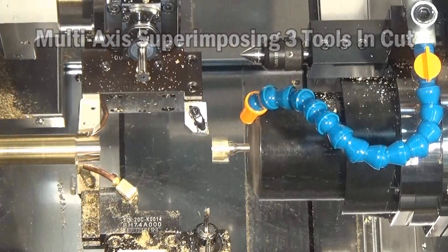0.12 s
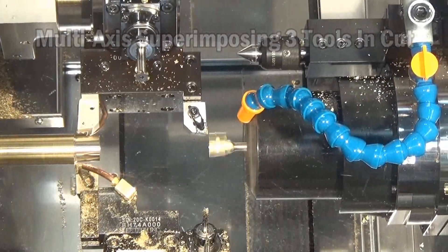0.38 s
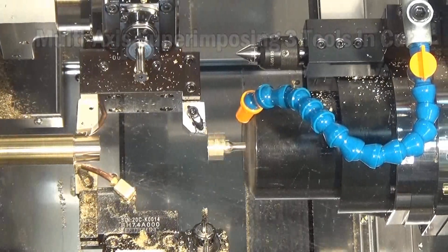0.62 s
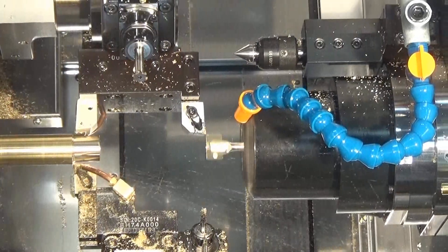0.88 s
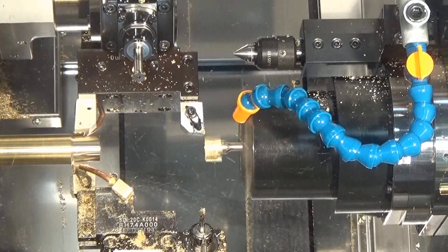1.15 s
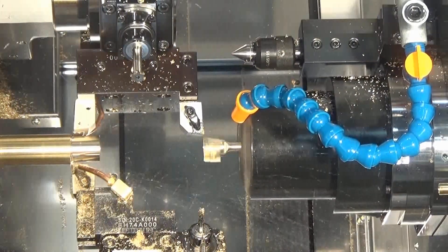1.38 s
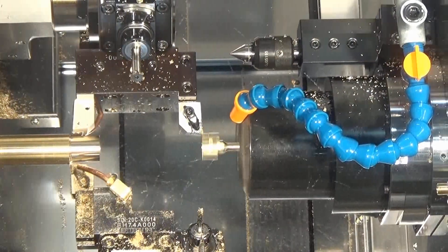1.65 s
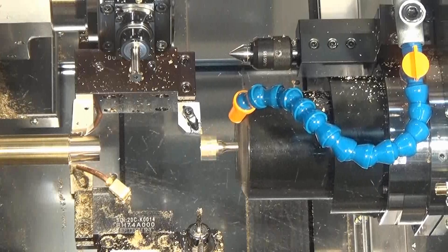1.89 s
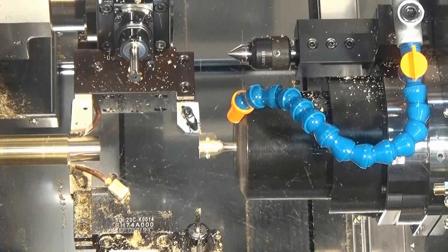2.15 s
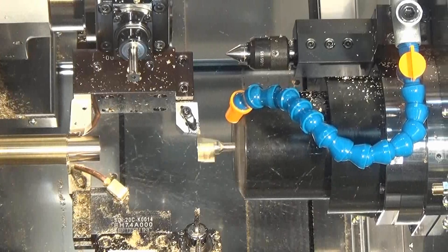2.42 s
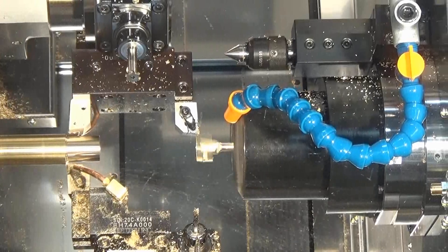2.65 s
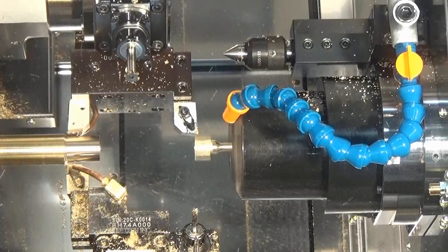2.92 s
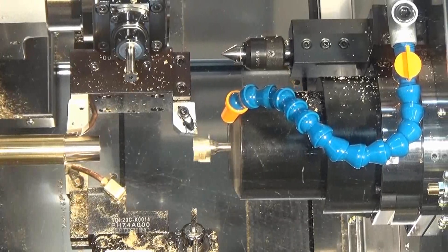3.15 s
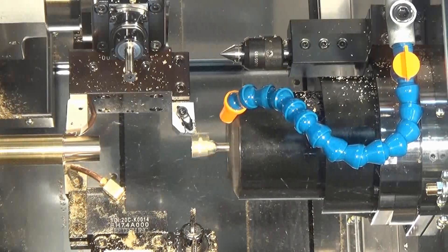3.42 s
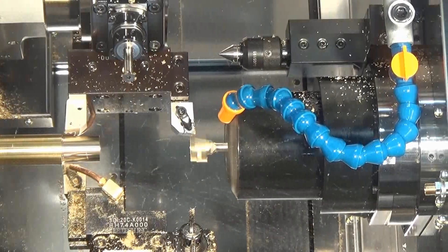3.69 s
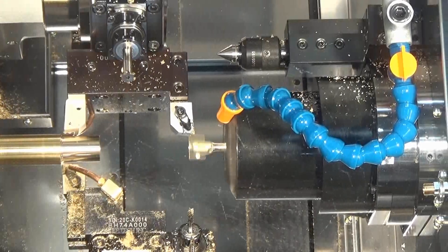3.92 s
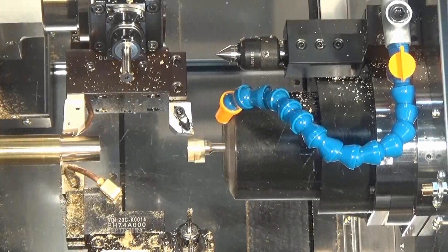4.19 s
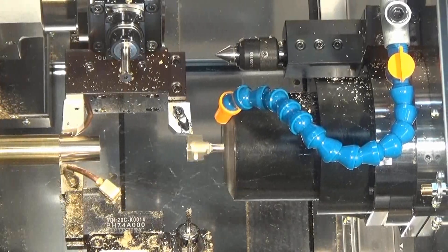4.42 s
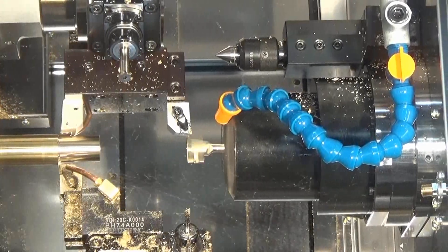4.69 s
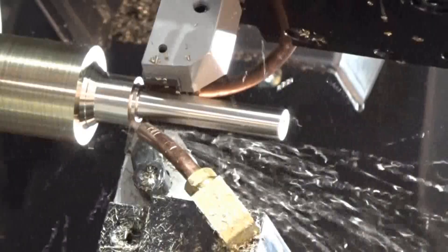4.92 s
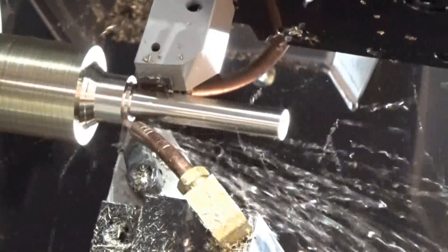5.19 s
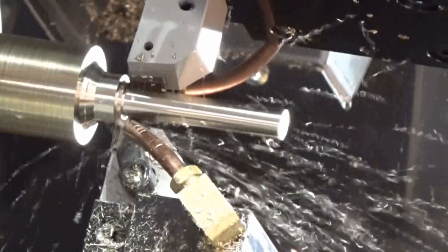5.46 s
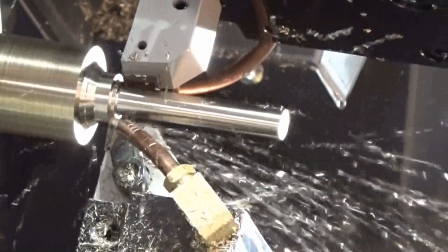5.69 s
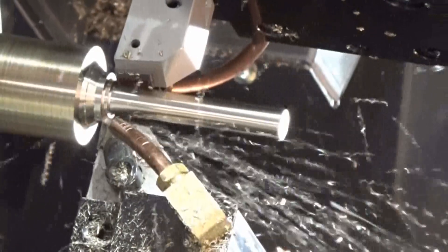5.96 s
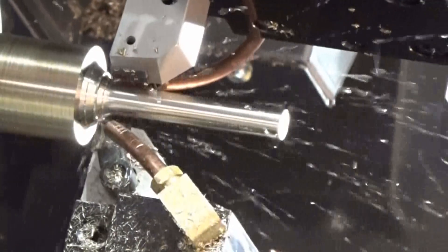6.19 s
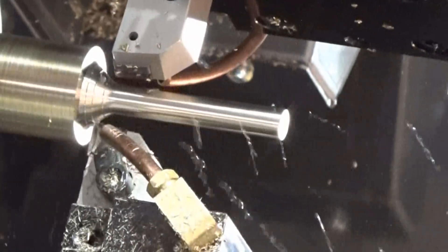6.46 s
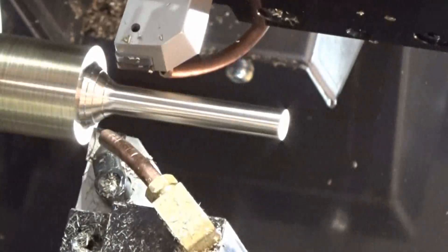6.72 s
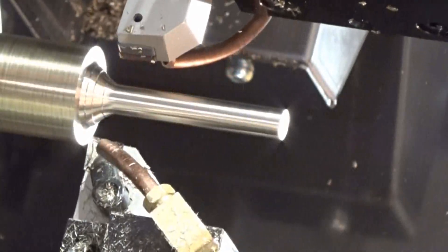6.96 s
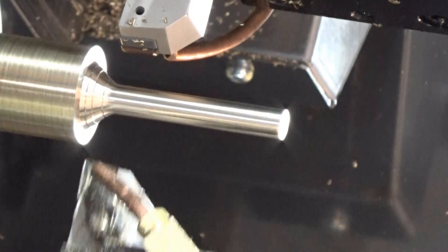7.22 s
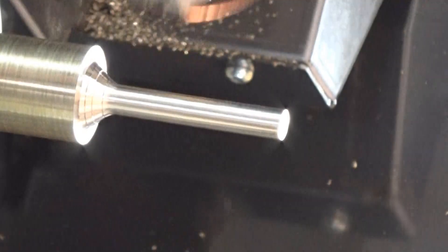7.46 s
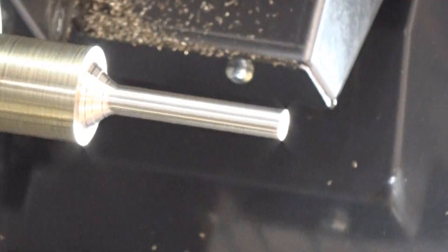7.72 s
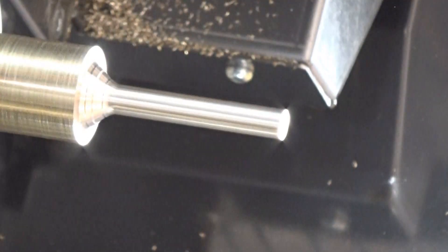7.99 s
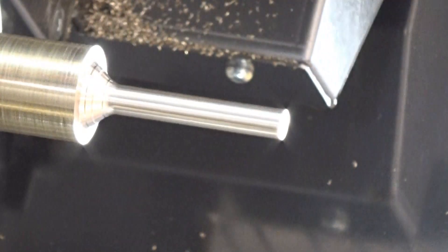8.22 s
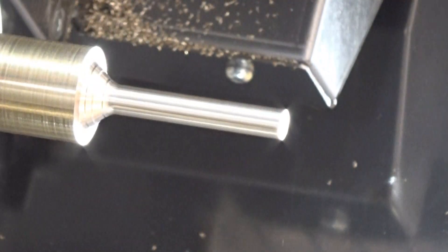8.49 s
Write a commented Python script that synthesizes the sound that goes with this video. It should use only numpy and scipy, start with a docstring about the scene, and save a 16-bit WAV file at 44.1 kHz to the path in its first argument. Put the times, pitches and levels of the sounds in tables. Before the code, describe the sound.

From the start a lathe cuts brass at close range, loud and continuous: dense bright noise concentrated around 3 to 5 kHz, with crisp chip sizzle above, fluttering with the spindle turns. A shrill chatter note near 3.5 kHz sings through it, strongest around 1.7 s; a dull frame hum lies below, and a rough note climbs and fades between about 1 and 2.5 s. At 4.9 s the sound switches abruptly to a narrower, steadier, more pitched screech with a fast throb and rattle, over faint hiss and hall drone. At 6.1 s the tool bites harder and lifts off: a short rough squeal leaps up and sags, air bursts, and the cutting collapses. The note rings down until about 7.4 s with thin motor whines. The drone thickens at 7.2 s. From 7.4 to 8.2 s hard metallic knocks come in irregular succession, the heaviest at 7.6, with sliding rush and air hiss; a last faint knock and puff arrive near 8.5 s.

```python
"""In a large hall a lathe turns a brass bar inside its cabinet. Two spindles cut as noise that partly repeats
each turn; the cut then switches abruptly to a second colour, with a hall drone and a faint steady hiss.
The tool's chatter note sings, and at lift-off it squeals and rings out. Resonant noise makes the frame hum,
the casing knocks, a sliding rush and air blasts; wavering sines make the whines."""
import sys
import numpy as np
from scipy import signal
from scipy.fft import rfft, irfft, next_fast_len
from scipy.io import wavfile
from scipy.ndimage import uniform_filter1d

SR = 44100
rng = np.random.default_rng(int(sys.argv[2]) if len(sys.argv) > 2 else 0)


def attenuation_scalar(level_db):
    """Turn a level in dB into a linear amplitude multiplier (20 dB per decade)."""
    decades = np.asarray(level_db, float) / 20
    return 10 ** decades


def store_pcm(level_fs):
    """Save levels as 16-bit WAV."""
    pcm = np.round(np.clip(level_fs, -1, 1) * 32767).astype(np.int16)
    wavfile.write(sys.argv[1], SR, np.atleast_2d(pcm).T)


N = 379701

T = np.arange(N) / SR
SIZE = next_fast_len(N + SR // 2)
HZ = np.maximum(np.arange(SIZE // 2 + 1) * SR / SIZE, 1)

MAIN_TURN_HZ, BACK_TURN_HZ = 37.28, 15.73  # spindle speeds
CHATTER_HZ = 94 * MAIN_TURN_HZ
SWITCH_S, LIFT_S = 4.885, 6.133  # first sound gives way to the second; tool leaves the metal

# body of the first cutting sound: t/s, level/dB
CUT_LEVEL = [(0, -8.5), (.6, -7.5), (2.0, -9.5), (3.6, -9.5), (3.75, -8), (4.6, -8.5), (4.88, -9)]
# colour of the first cutting sound, then of the second: f/Hz, relative level/dB
FIRST_COLOUR = [(1180, -25), (2000, -22.5), (2700, -18.5), (3120, -3.5), (3340, -5), (3640, -3),
                (4030, -1.5), (4670, -8.5), (5350, -18), (6570, -22.5), (7340, -13.5), (9020, -18.5),
                (10600, -13), (11900, -11.5), (15500, -28)]
SECOND_COLOUR = [(1180, -33), (2000, -26.5), (2820, -23.5), (2960, -9), (3520, -2.5), (4250, -17),
                 (4950, -16.5), (5930, -29), (7220, -18.5), (9100, -32), (9820, -23), (10200, -16.5),
                 (10900, -15.5), (14200, -24.5), (15500, -37)]
# strongest notes of the marks left on the bar, first sound: f/Hz, level/dB before a 2.5 dB trim
FIRST_MARKS = [(3058, -16), (3095, -19), (3170, -14), (3241, -17), (3755, -18), (3880, -18), (3914, -14),
               (4157, -16)]
# the same in the second sound, against the cutting level: f/Hz, level/dB
SECOND_MARKS = [(3541, -17), (3616, -16), (3728, -21)]
# rings of tool holder and cabinet: f/Hz, width/Hz, boost level/dB
HOLDER_RINGS = [(7520, 200, 8.5), (7980, 39, 1), (10460, 290, 4), (11180, 150, 6), (11400, 65, 3),
                (12070, 390, 8)]
# chatter note, ringing out in steps after lift-off: t/s, level/dB
CHATTER_LEVEL = [(0, -20), (.55, -18), (.7, -15.5), (1.05, -19), (1.2, -16), (1.7, -11.5), (2.4, -21),
                 (3.3, -25), (3.9, -17.5), (5.5, -14), (6.1, -16), (6.2, -19), (6.54, -22.5), (6.62, -33),
                 (6.9, -32.5), (7.0, -38.5), (7.4, -52)]
# chatter overtones against the bite level: multiple of the note, offset f/Hz, level/dB
CHATTER_OVERTONES = [(2, 1, -6.5), (3, -2, -5), (3, -36, -0.5), (4, 3, -21)]
# notes near half the chatter pitch:
# offset f/Hz, full from t/s, level/dB before a 4 dB lift, rise/(dB/s), sinks from t/s, fall/(dB/s)
HALF_PITCH_NOTES = [(0, 6.0, -33, 4.5, 6.08, 60), (-126.8, 4.86, -35.5, 25, 5.5, 14),
                    (126.8, 4.9, -35.5, 8, 5.9, 8)]
# stereo place of the chatter note: t/s, share added left and taken from the right
CHATTER_PLACE = [(4.1, 0.25), (4.4, 0.14), (6.1, 0.13), (6.35, -0.43)]
# frame resonances: f/Hz, width/Hz, relative level/dB per Hz of width
FRAME_RINGS = [(534, 134, -2.5), (931, 40, 2), (1119, 75, 3.5)]
# broad noise of the frame: f/Hz, relative level/dB
FRAME_COLOUR = [(24, -53), (40, -19.5), (430, -9), (531, -3.5), (928, -5.5), (1010, -10), (1120, -5.5),
                (1360, -12), (2600, -11.5), (3380, -5), (5720, -120)]
# slide blows: t/s, casing level/dB, bright crack level/dB, own note f/Hz, own note level/dB
SLIDE_KNOCKS = [(7.430, -22, -24, 1610, -31), (7.464, -22.5, -21, 3050, -20),
                (7.489, -50.5, -44, 1010, -9.5), (7.61, -13, -18, 1650, -11), (7.619, -33, -36, 484, -27),
                (7.708, -38.5, -12, 3700, -27), (7.903, -30, -31, 2380, -27),
                (8.034, -24.5, -33, 1300, -33), (8.186, -24, -43, 1900, -26), (8.549, -37, -30, 143, -21)]
# casing modes: f/Hz, width/Hz, relative level/dB
CASING_MODES = [(265, 57, -15), (825, 590, 6), (1430, 880, 9), (1730, 260, 8), (2240, 820, -2),
                (2930, 700, 0)]
# rings of a running slide: f/Hz, width/Hz, level/dB
SLIDE_RINGS = [(1700, 460, -38), (2320, 290, -41), (3720, 280, -44.5)]
# drive whine and its sidebands: multiple of the motor's beat, relative level/dB
DRIVE_LINES = [(0, 0), (1, -1), (-1, -3), (6.3, -11), (7.9, -7), (-7.9, -9)]
# motor and drive whines: start t/s, end t/s, start f/Hz, end f/Hz, level/dB
MACHINE_WHINES = [(.4, 4.9, 383, 383, -43), (5.35, 7.5, 383, 383, -46), (5.2, 5.8, 1290, 1130, -52),
                  (6.2, 6.42, 222, 255, -44), (6.5, 7.5, 233, 233, -49), (1.2, 4.2, 608, 608, -43),
                  (6.7, 7.5, 770, 770, -51), (6.125, 6.185, 1600, 1460, -30), (6.4, 8.7, 6740, 6740, -56)]
# rough hums: start t/s, end t/s, f/Hz, width/Hz, level/dB
ROUGH_HUMS = [(4.6, 6.4, 494, 77, -43), (0.69, 10, 117.4, 14, -55)]
# air blasts: start t/s, end t/s, rise/s, level/dB, fall/(dB/s), negative where the blast grows
AIR_BLASTS = [(6.196, 6.8, 0.044, -30.5, 70), (7.345, 7.747, 0.08, -40.5, -10),
              (7.602, 8.218, 0.17, -35.5, 23), (8.538, 8.7, .03, -42, 0)]
# colour of the hissing air: f/Hz, relative level/dB
HISS_COLOUR = [(2350, -36), (4000, -8), (4690, -1), (5910, -13), (6960, -3), (8350, -9.5), (11300, 1.5),
               (15500, -12)]
# steps of the drone: start t/s, duration/s, level/dB, bass against the rest level/dB
DRONE_STEPS = [(4.89, 0.31, -40.5, -10), (6.1, 0.073, -36, 4), (7.201, 0.32, -30.5, 7)]
# colour of the drone: f/Hz, relative level/dB
DRONE_COLOUR = [(35, -38), (60, -9), (211, -7.5), (271, 1.5), (301, -7), (683, -1.5), (2720, -11.5),
                (3090, -11), (6040, -25), (9000, -32), (11700, -68)]
# stereo difference by frequency, cutting sounds first, then the rest: f/Hz, level/dB
NEAR_SIDE = [(100, -44), (380, -20.5), (1000, -9), (2200, -28), (3000, -25.5), (4800, -15), (6000, -31),
             (7400, -22), (15000, -35)]
FAR_SIDE = [(100, -44), (380, -18.5), (1290, -10.5), (4400, -9.5), (15000, -23)]


def unit(x):
    """Scale to rms 1."""
    return x / np.sqrt(np.mean(x ** 2))


def shape(x, gain):
    """Filter by a gain given at every frequency."""
    return irfft(rfft(x, SIZE) * gain, SIZE)[:N]


def noise(gain):
    """Noise of rms 1 in a colour."""
    return unit(shape(rng.standard_normal(N), gain))


def colour(points):
    """Gain through points of frequency and level."""
    hz, db = np.transpose(points)
    return attenuation_scalar(np.interp(np.log(HZ), np.log(hz), db))


def ring(hz, width):
    """One resonance, gain 1 at its centre."""
    return 1 / (1 + 2j * (HZ - hz) / width)


def repeat(turn_hz, memory):
    """Each turn cuts into the marks of the last one, so the noise partly repeats."""
    keep = np.clip(memory, 0, .95)
    return np.sqrt(1 - keep ** 2) / (1 - keep * np.exp(-2j * np.pi * HZ / turn_hz))


def curve(table):
    """Second column of a timed table at every sample."""
    s, value = np.transpose(table)
    return np.interp(T, s, value)


def gate(start, end, edge=.01):
    """Ramped switch on and off."""
    return np.clip((T - start) / edge, 0, 1) * np.clip((end - T) / edge, 0, 1)


def walk(rate):
    """Random levels held 1 / rate s and slewed twice, on a grid of 16 samples."""
    k = max(int(SR / rate / 16), 1)
    held = np.repeat(rng.standard_normal(N // 16 // k + 2), k)
    slewed = uniform_filter1d(uniform_filter1d(held, k), k)
    return np.interp(T, np.arange(len(held)) * 16 / SR, slewed)


def tone(hz, waver_db, drift_hz, rate=12):
    """A note of about rms 1 that wavers in level and pitch."""
    phase = 2 * np.pi * np.cumsum(hz + drift_hz * walk(rate)) / SR + 7 * rng.random()
    return np.sqrt(2) * attenuation_scalar(waver_db * walk(rate)) * np.sin(phase)


def swell(top, full, rise, end, fall):
    """Level or pitch that climbs until full, holds, and sinks after end; slopes are per second."""
    return top - rise * np.maximum(full - T, 0) - fall * np.maximum(T - end, 0)


def fade(first_db_s, linger_db, linger_db_s):
    """Gain after lift-off: a quick fall that gives way to a slower one."""
    age = np.maximum(T - LIFT_S, 0)
    return np.maximum(attenuation_scalar(-first_db_s * age), attenuation_scalar(linger_db - linger_db_s * age))


def wander(x, depth_db):
    """Narrow strands of the sound swell and fade on their own as the tools move along the bar."""
    _, _, z = signal.stft(x, nperseg=1024)
    strands = rng.standard_normal(z.shape)
    for _ in range(2):
        strands = uniform_filter1d(strands, size=20, axis=1)
    strands = unit(uniform_filter1d(strands, size=2, axis=0))
    return signal.istft(z * attenuation_scalar(depth_db * strands), nperseg=1024)[1][:N]


def cut(first):
    """Chip noise that repeats once a turn; the repeat fades in the treble, where chips break at random."""
    holder = attenuation_scalar(sum(db * abs(ring(hz, w)) ** 2 for hz, w, db in HOLDER_RINGS))
    main = repeat(MAIN_TURN_HZ, 0.5 / (1 + (HZ / 8000) ** 2))
    back = repeat(BACK_TURN_HZ, 0.5 / (1 + (HZ / 7000) ** 2))
    # the back tool owns the band around 3.5 to 5.5 kHz, the main tool the rest
    share = np.clip((HZ - 3450) / 150, 0, 1) * np.clip((6000 - HZ) / 800, 0, 1)
    first_cut = noise(colour(FIRST_COLOUR) * holder * (share * back + (1 - share) * main))
    steady = repeat(MAIN_TURN_HZ, .84 / (1 + (HZ / 11000) ** 2) / (1 + (2700 / HZ) ** 8))
    second_cut = noise(colour(SECOND_COLOUR) * holder ** 0.69 * steady)

    first_marks = sum(attenuation_scalar(db + 3.0 * walk(2.5)) * tone(hz, 1.3, 2.554) for hz, db in FIRST_MARKS)
    first_cut = wander(first_cut, 2.2) + attenuation_scalar(-2.5) * first_marks
    second_marks = sum(attenuation_scalar(db) * tone(hz, 0.99, 0.63) for hz, db in SECOND_MARKS)
    second_cut = attenuation_scalar(-1.0) * wander(second_cut, 0.33) + second_marks
    sound = first * first_cut + (1 - first) * second_cut

    treble = shape(sound, np.clip((HZ - 5600) / 800, 0, 1))
    treble_rms = np.sqrt(uniform_filter1d(treble ** 2, SR // 20) + 1e-12)
    # the tool bites harder just as it leaves, the chips twice as much in dB
    burst_db = np.exp(-((T - LIFT_S) / 0.086) ** 2)
    body_db = first * curve(CUT_LEVEL) + (1 - first) * -12.5 + burst_db
    second_chips_db = swell(-19.5, 0, 0, SWITCH_S, 2)
    chips_db = first * -17 + (1 - first) * second_chips_db + 2 * burst_db
    # the chip stream is uneven, most of all in the treble
    flicker_db = 0.62 * walk(60) + 0.8 * walk(9.2)
    body = attenuation_scalar(body_db + 0.55 * flicker_db) * fade(42, -5, 19.4) * (sound - treble)
    chips_gain = attenuation_scalar(chips_db + flicker_db + 0.52 * walk(130)) * fade(77, -36.5, 28)
    return body + chips_gain * treble / treble_rms


def chatter():
    """The tool sings on a multiple of the spindle speed; overtones last only while it bites."""
    overtones = sum(attenuation_scalar(db) * tone(k * CHATTER_HZ + shift, 2.3, 1.84) for k, shift, db in CHATTER_OVERTONES)
    # the overtones grow as the chatter settles in
    bite_db = np.maximum(swell(-25, 4.5, 13, N, 0), -60)
    bite_db = bite_db + swell(0, 0, 0, LIFT_S, 250)
    # in the second sound the note throbs three times a turn until lift-off
    throb = 1 + .65 * gate(SWITCH_S, LIFT_S) * np.cos(2 * np.pi * 3 * MAIN_TURN_HZ * T)
    note = attenuation_scalar(curve(CHATTER_LEVEL)) * throb * tone(CHATTER_HZ, 0.73, 1.53)
    out = note + attenuation_scalar(bite_db) * overtones
    # the half notes share one phase, so they beat as a regular rattle
    half_phase = 2 * np.pi * np.cumsum(CHATTER_HZ / 2 + 1.5 * walk(11)) / SR
    for shift, full, db, rise, end, fall in HALF_PITCH_NOTES:
        half_note = attenuation_scalar(4 + 2.2 * walk(18)) * np.sin(half_phase + 2 * np.pi * shift * T) * gate(3.9, 9, .3)
        out = out + attenuation_scalar(swell(db, full, rise, end, fall)) * fade(300, -5, 6) * half_note
    return out


def squeal():
    """As the tool leaves the metal a note leaps up and sags, roughened by slow noise on its level."""
    top_hz, top_s = 4820, 6.2
    hz = swell(top_hz, top_s, 4000, top_s, 1400)
    glide = np.sqrt(2) * np.sin(2 * np.pi * np.cumsum(hz) / SR)
    gain = attenuation_scalar(swell(-19, 0, 0, 6.25, 75)) * gate(6.125, 9, .04) * gate(0, 6.52, .2)
    return gain * glide * (0.4 + noise(ring(0, 750) ** 2))


def riser():
    """A rough frame note climbs towards its top pitch, swells and sinks away."""
    start_s, low_hz, top_hz, climb_s = .85, 1470, 1650, 1.8
    hz = top_hz - (top_hz - low_hz) * np.exp((start_s - T) / climb_s)
    glide = np.exp(2j * np.pi * np.cumsum(hz) / SR)
    # slow noise in level and phase makes it rough
    scatter = 1 + noise(ring(0, 45) ** 2) + 1j * noise(ring(0, 45) ** 2)
    return attenuation_scalar(swell(-31, 2.05, 6, 2.45, 14)) * gate(start_s, 9, .2) * np.real(glide * scatter)


def frame(first):
    """Frame resonances hum as narrow and broad noise, heard in the first sound only."""
    rings = unit(sum(attenuation_scalar(db) * noise(ring(hz, w) ** 2) * np.sqrt(w) for hz, w, db in FRAME_RINGS))
    bed = noise(colour(FRAME_COLOUR)) * attenuation_scalar(1.2 * walk(6.34))
    return first * (attenuation_scalar(-29.0) * rings + attenuation_scalar(-29.5) * bed + riser())


def knocks():
    """Each blow shakes the casing modes and a note of its own; a thud below, a short crack above."""
    casing = noise(sum(attenuation_scalar(db) * ring(hz, w) for hz, w, db in CASING_MODES))
    low = noise(ring(280, 470) ** 2)
    high = noise(ring(8300, 11000) ** 2)
    white = rng.standard_normal(N)
    out = np.zeros(N)
    for s, db, crack_db, hz, note_db in SLIDE_KNOCKS:
        thud_db = -12 + 0.76 * db  # grows more slowly than the casing
        t60_s = 0.095 * (1000 / hz) ** 0.32  # blows with higher notes die sooner
        on = slice(int(s * SR), N)
        age = T[on] - T[on][0]
        # faint blows come from farther off and start more softly
        attack = np.clip(age / (0.00015 * attenuation_scalar(-.9 * db)), 0, 1)
        fall = attack * attenuation_scalar(-60 * age / max(t60_s, .02))
        tail = np.clip(age / 0.0058, 0, 1) * attenuation_scalar(-10.5 - 60 * age / 0.86)
        note = unit(signal.lfilter(*signal.iirpeak(hz, 9.0, fs=SR), white[on]))
        body = (attenuation_scalar(db) * casing[on] + attenuation_scalar(thud_db) * low[on]) * (fall + tail)
        crack = attenuation_scalar(crack_db) * high[on] * fall ** 1.9
        out[on] += body + attenuation_scalar(note_db) * note * fall + crack
    return out


def slide():
    """A slide runs on its rails between the knocks: uneven noise in three resonances."""
    rush = sum(attenuation_scalar(db) * noise(ring(hz, w) ** 2) for hz, w, db in SLIDE_RINGS)
    return gate(7.7, 8.24, 0.023) * attenuation_scalar(2 * walk(20)) * rush


def drive():
    """The spindle brakes after lift-off: the sidebands of its drive whine close in on the carrier."""
    carrier_hz, end_s = 11999, 7.4
    beat_hz = swell(142, 0, 0, LIFT_S, 82)
    lines = 0
    for k, db in DRIVE_LINES:
        line_end_s = end_s - .2 * (k != 0)  # the sidebands stop first
        lines = lines + attenuation_scalar(db) * tone(carrier_hz + k * beat_hz, 4.5, 5) * gate(LIFT_S, line_end_s, .1)
    return attenuation_scalar(-48) * lines


def whines():
    """Motor and drive whines: wavering sines, steady or gliding."""
    out = 0
    for start, end, hz0, hz1, db in MACHINE_WHINES:
        hz = np.interp(T, [start, end], [hz0, hz1])
        out = out + attenuation_scalar(db) * tone(hz, 2.7, hz0 / 700, 25) * gate(start, end, 0.028)
    return out


def hums():
    """Rough hums: noise through narrow resonances."""
    return sum(attenuation_scalar(db) * noise(ring(hz, w) ** 2) * gate(a, b, 0.021) for a, b, hz, w, db in ROUGH_HUMS)


def air(first):
    """Turbulent air hisses in blasts; a faint steady hiss lies under the second sound."""
    blasts = 0
    for start, end, rise, db, fall in AIR_BLASTS:
        level = attenuation_scalar(swell(db, 0, 0, start + rise, fall))
        blasts = blasts + level * np.clip((T - start) / rise, 0, 1) * gate(-1, end, .03)
    return ((1 - first) * attenuation_scalar(-47) + blasts) * attenuation_scalar(1.2 * walk(36)) * noise(colour(HISS_COLOUR))


def hall(first):
    """Drone noise under the second sound: it sinks at first, then steps up near lift-off and before the knocks."""
    drone_db, bass_db = -35.5, DRONE_STEPS[0][3]
    for s, takes, db, low_db in DRONE_STEPS:
        step = np.clip((T - s) / takes, 0, 1)
        drone_db = drone_db + step * (db - drone_db)
        bass_db = bass_db + step * (low_db - bass_db)
    whole = noise(colour(DRONE_COLOUR))
    bass = shape(whole, 1 / (1 + (HZ / 380) ** 4))
    return (1 - first) * attenuation_scalar(drone_db + 1.5 * walk(8)) * (whole + (attenuation_scalar(bass_db) - 1) * bass)


def diffuse_tail():
    """Spectrum of a dense stereo blur: noise of unit energy dying by 60 dB in 0.3 s."""
    tail = rng.standard_normal(SR // 3) * attenuation_scalar(-60 * T[:SR // 3] / .3)
    return rfft(tail / np.sqrt(np.sum(tail ** 2)), SIZE)


def scene():
    """All sources, with a diffuse side signal added left and subtracted right."""
    first = gate(-1, SWITCH_S, 0.0042)  # 1 in the first sound, 0 in the second
    note = chatter()
    near = cut(first) + note + frame(first) + squeal()
    far = hall(first) + air(first) + hums() + whines() + knocks() + drive() + slide()
    blur = diffuse_tail()
    side = shape(near, colour(NEAR_SIDE) * blur) + shape(far, colour(FAR_SIDE) * blur)
    # the cutting sounds lean slightly left around 4.4 kHz; the chatter note has its own place
    side = side + 0.015 * shape(near, abs(ring(4400, 2000))) + curve(CHATTER_PLACE) * note
    return np.array([near + far + side, near + far - side])


def band_limit(x):
    """A steep low-pass at the top of the band."""
    return signal.sosfilt(signal.butter(12, 15610, fs=SR, output="sos"), x)


def record(dry):
    """The microphones lose the deep bass; the input clips at full scale."""
    cut_bass = signal.sosfilt(signal.butter(2, 80, "high", fs=SR, output="sos"), dry)
    mix = np.clip(cut_bass, -1, 1)
    return band_limit(mix)


dry = scene()
out = record(dry)
store_pcm(out)
```